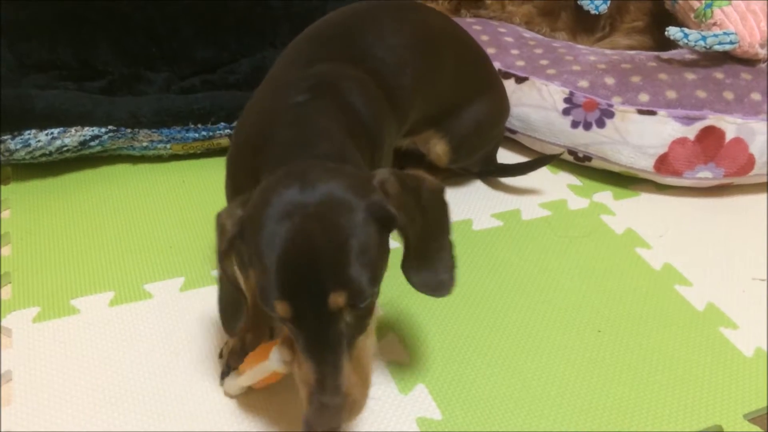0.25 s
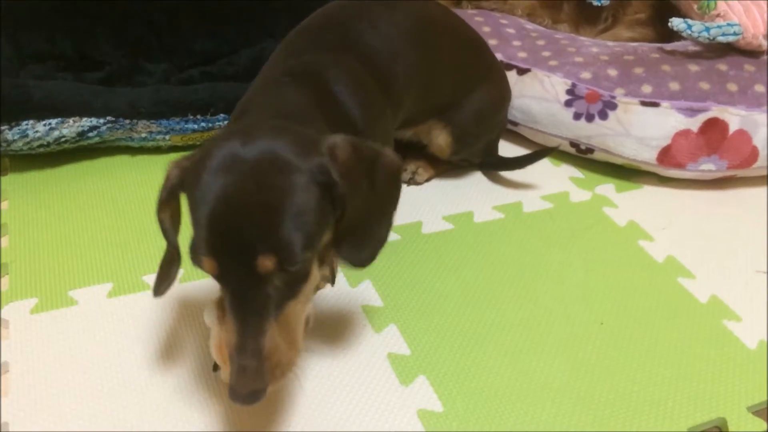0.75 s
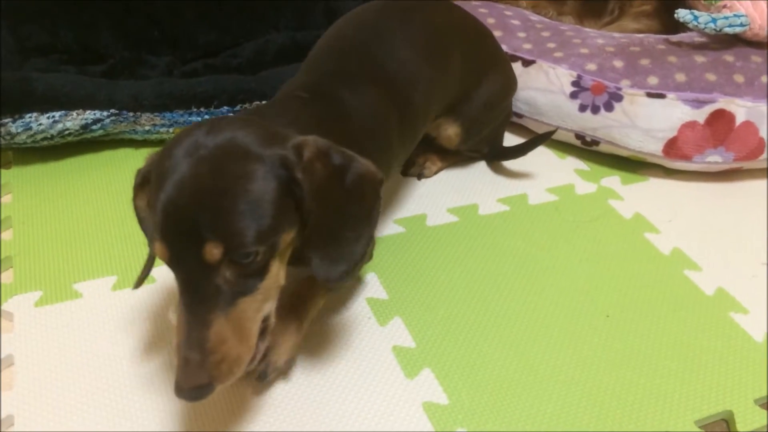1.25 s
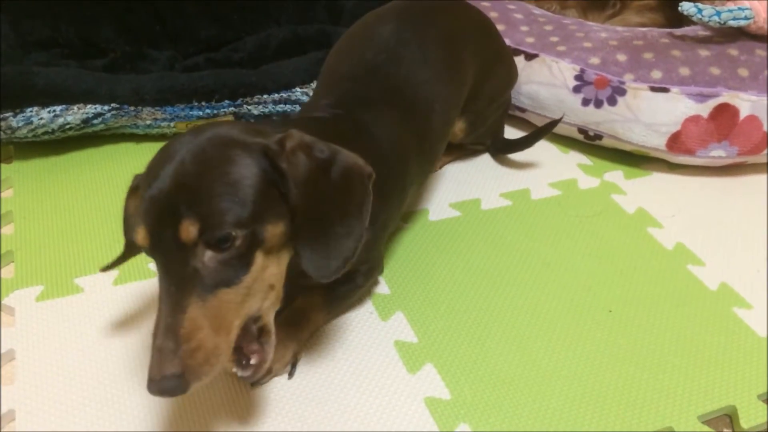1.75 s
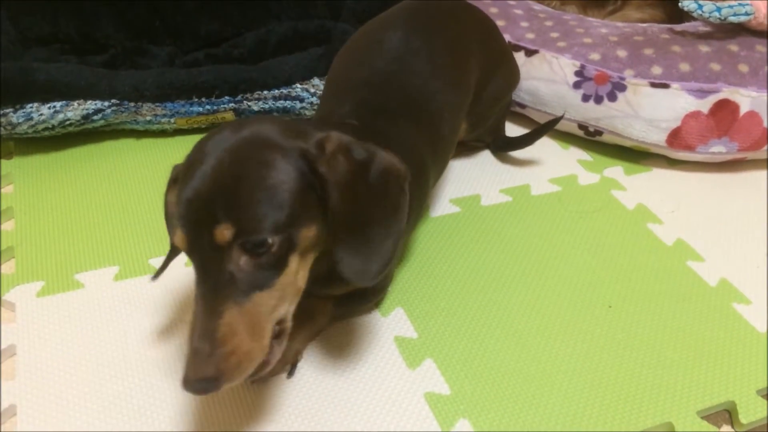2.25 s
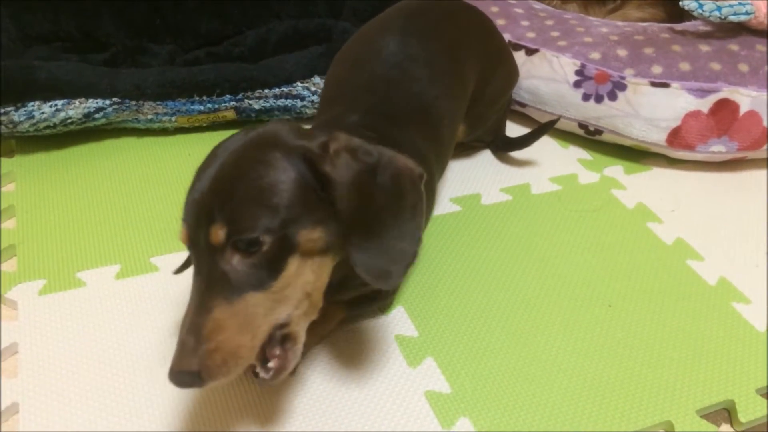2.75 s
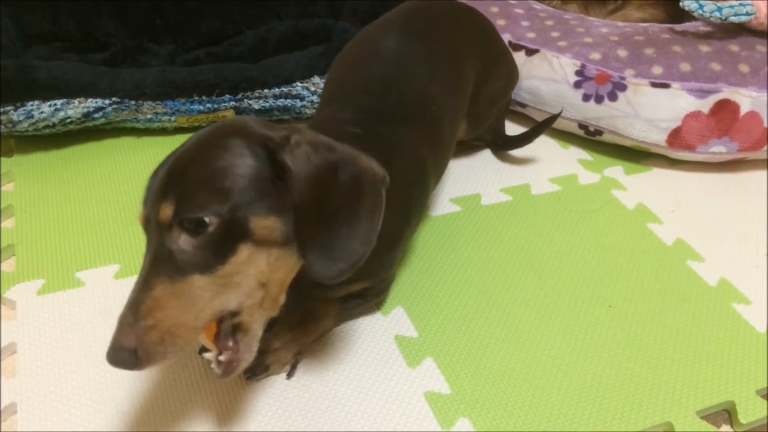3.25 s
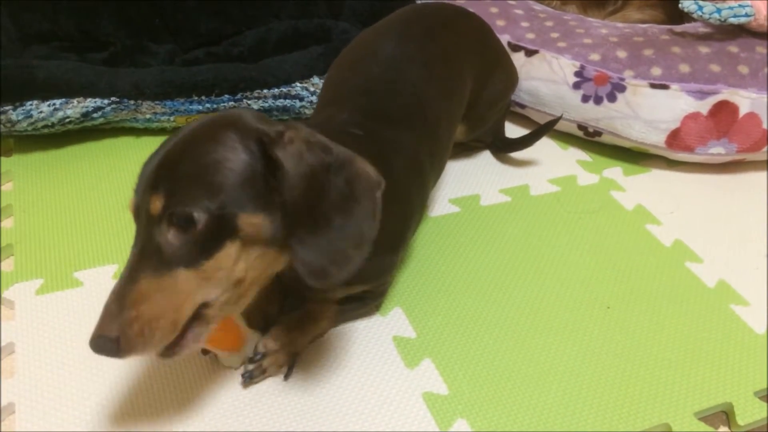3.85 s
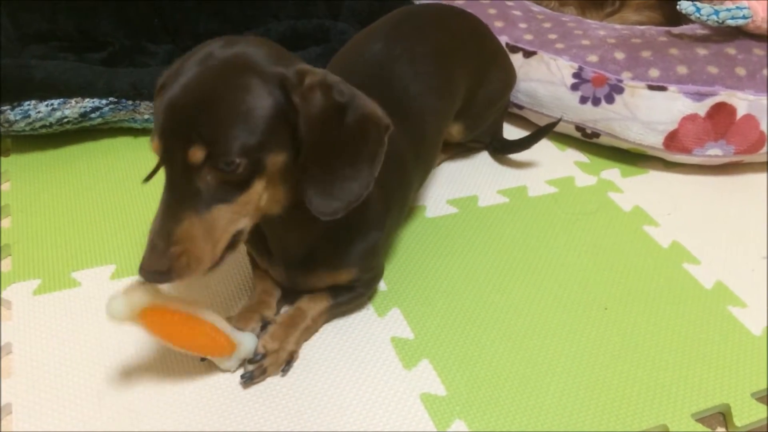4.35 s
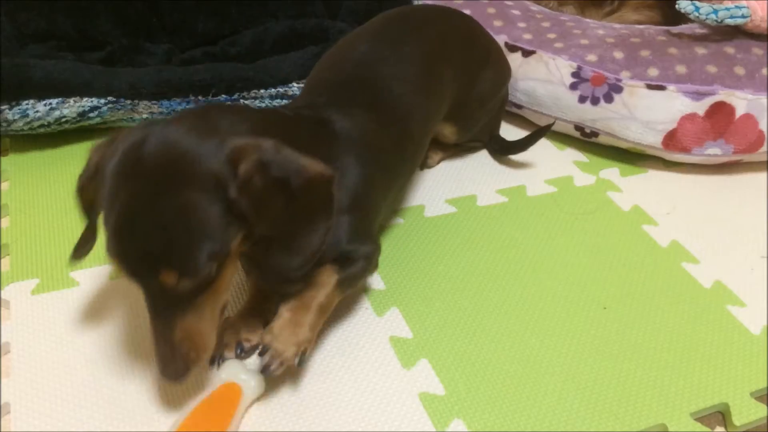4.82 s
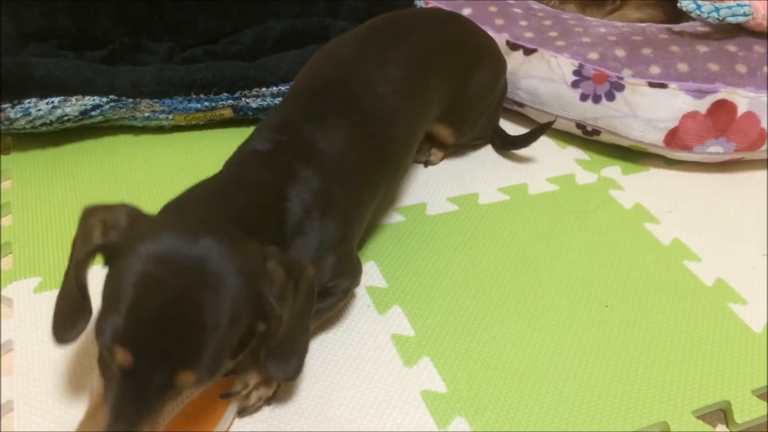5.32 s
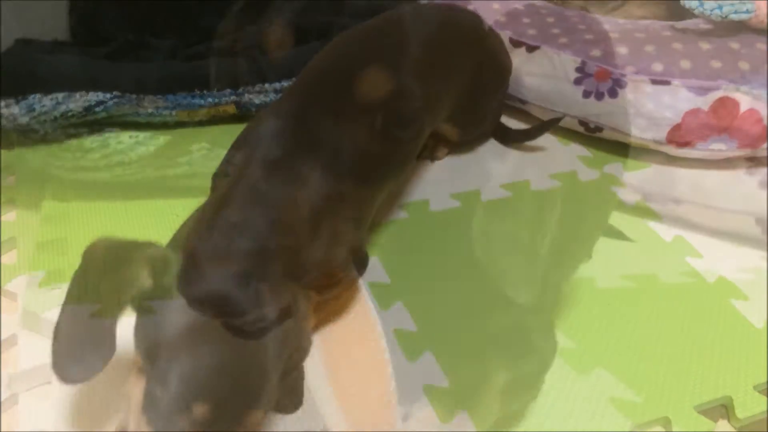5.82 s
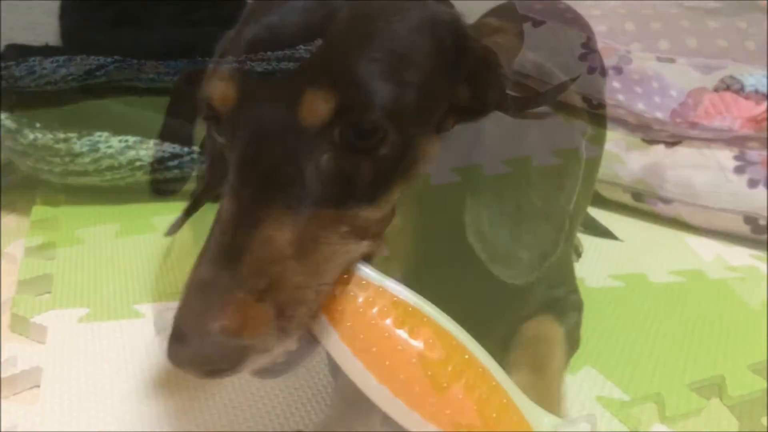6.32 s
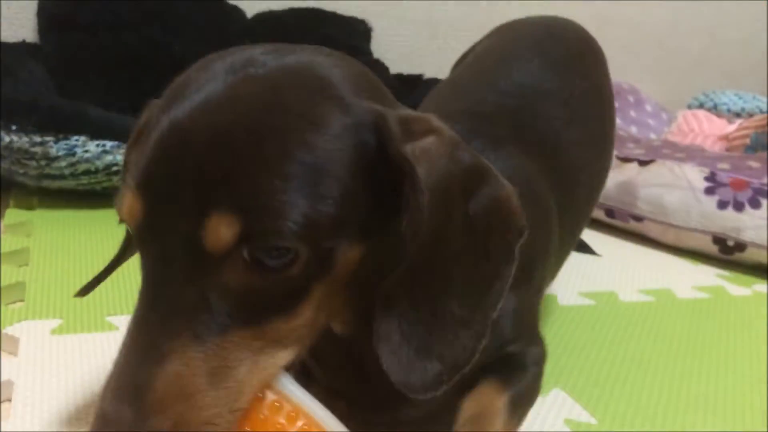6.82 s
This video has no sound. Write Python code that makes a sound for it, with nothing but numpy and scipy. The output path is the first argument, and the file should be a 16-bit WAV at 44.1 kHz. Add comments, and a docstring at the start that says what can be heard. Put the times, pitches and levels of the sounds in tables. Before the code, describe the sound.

A small dog gnaws a hard hollow toy in a quiet room, teeth knocking irregularly, the toy clacking onto foam mats, then closer chewing.

```python
"""Still air, a faint brushing of fur and a low floor rumble, then lips smack and teeth knock on a toy:
a small dog gnaws a hard chew toy on foam floor mats in a quiet room, the floor booming under its shifts.
The toy drops with a clack, is picked up again and is chewed and dragged over the mat, heard closer.
Blows are damped modes with noise cracks, rubbing is coloured random slips, the floor is evened noise
bands, and the room is noise that follows each band's stored energy."""
import sys
import numpy as np
from scipy import signal
from scipy.fft import rfft, irfft, next_fast_len
from scipy.io import wavfile
from scipy.ndimage import uniform_filter1d

SR = 44100
rng = np.random.default_rng(int(sys.argv[2]) if len(sys.argv) > 2 else 0)


def wrap_up_sound(samples):
    """Save the sound to the file named by the first command line argument, as 16-bit audio."""
    columns = np.atleast_2d(samples).T
    # keep every value between -1 and 1, then stretch to whole-number steps
    tamed = np.clip(columns, -1, 1)
    steps = np.round(tamed * 32767).astype(np.int16)
    wavfile.write(sys.argv[1], SR, steps)


N = 312228
TIME = np.arange(N) / SR
HIT_TIME = TIME[:2600]
ATTACK = HIT_TIME < 0.005


def from_db(db):
    """Decibels to gain."""
    return 10 ** (np.asarray(db) / 20)


def rms_one(x):
    """Scale to unit power."""
    return x / np.sqrt(np.mean(x ** 2) + 1e-20)


def attack_one(x):
    """Scale a hit to unit power over its attack."""
    return x / np.sqrt(np.mean(x[ATTACK] ** 2) + 1e-20)


def at_hz(points, hz, axis=1):
    """Read a table column on a log-frequency axis."""
    points = np.array(points)
    return np.interp(np.log(hz + 1), np.log(points[:, 0]), points[:, axis])


def band(x, low_hz, high_hz):
    """Causal band-pass."""
    edges_hz = [low_hz, min(high_hz, 0.48 * SR)]
    return signal.sosfilt(signal.butter(2, edges_hz, "band", fs=SR, output="sos"), x)


def resonance(x, hz, width_hz):
    """Two-pole resonance, gain 1 at its peak."""
    r = np.exp(-np.pi * width_hz / SR)
    zeros = (1 - r * r) / 2 * np.array([1, 0, -1])
    poles = [1, -2 * r * np.cos(2 * np.pi * hz / SR), r * r]
    return signal.lfilter(zeros, poles, x)


def coloured(x, spectrum):
    """Give a white excitation a spectrum; unit power."""
    gain = from_db(at_hz(spectrum, np.fft.rfftfreq(N, 1 / SR)))
    return rms_one(irfft(rfft(x) * gain, N))


def add(out, start_s, sound):
    """Mix a sound in at a time."""
    start = int(np.clip(round(start_s * SR), 0, N - 1))
    out[start:start + len(sound)] += sound[:N - start]


def friction(slips_per_s, spread_db, smooth):
    """Tiny random slips of uneven size over a smooth rush."""
    sizes = from_db(spread_db * np.minimum(rng.exponential(1, N), 4)) * rng.choice([-1, 1], N)
    slips = sizes * (rng.random(N) < slips_per_s / SR)
    return rms_one(slips) + smooth * rng.standard_normal(N)


# still-air spectrum: (frequency [Hz], relative density [dB per Hz])
AIR_SPECTRUM = [(15, -57), (25, -10), (64, 2.5), (178, 3), (260, -16.5), (378, -3), (741, -16),
                (919, -16.5), (1490, -22.5), (1620, -21), (4040, -30.5), (14300, -32.5), (15500, -55.5)]
AIR_DB = -62


def still_air():
    """Steady noise shaped to the room's quiet background."""
    return from_db(AIR_DB) * coloured(rng.standard_normal(N), AIR_SPECTRUM)


# rubbing and hissing spectra, shared by several frictions: (frequency [Hz], relative density [dB per Hz])
RUB_SPECTRUM = [(300, 0.5), (600, -4), (1050, 3), (1600, 1), (2100, 3), (2650, -17.5), (4500, -32),
                (8000, -26.5)]
HISS_SPECTRUM = [(2000, 3), (3500, 5.5), (6000, 0.5), (9000, 0), (12000, -3.5), (15500, -0.5)]
# brushing briskness: (time [s], level [dB], before trim)
SLIDING = [(0.0, -72), (0.47, -80), (0.78, -70), (1.46, -80), (1.72, -69.5), (1.89, -70.5), (2.03, -76.5),
           (2.75, -74), (3.85, -77), (4.24, -87), (4.82, -66.5), (5.33, -76), (5.5, -69), (5.98, -65.5),
           (6.35, -67.5), (6.85, -62.5), (7.08, -71.5)]
BRUSH_TRIM_DB = -3.5
BRUSH_HISS_DB, HISS_FOLLOWS = -75, 0.73   # hiss at mean briskness; its share of the swing


def sliding():
    """Fur and paws slip faintly over the foam; the hiss follows the rub's level in part."""
    rub_db = np.interp(TIME, *np.transpose(SLIDING))
    hiss_db = BRUSH_HISS_DB + HISS_FOLLOWS * (rub_db - rub_db.mean())
    coarse = friction(slips_per_s=120, spread_db=4.0, smooth=0.8)
    fine = friction(slips_per_s=120, spread_db=4.5, smooth=1.6)
    rub = from_db(rub_db + BRUSH_TRIM_DB) * coloured(coarse, RUB_SPECTRUM)
    return rub + from_db(hiss_db) * coloured(fine, HISS_SPECTRUM)


def floor_mode(low_hz, high_hz, even_s):
    """A broad floor resonance kept swinging by random pushes, at an even strength."""
    swing = band(rng.standard_normal(N), low_hz, high_hz)
    envelope = np.abs(signal.hilbert(swing, next_fast_len(N))[:N])
    power = uniform_filter1d(envelope ** 2, max(int(even_s * SR), 1))
    return rms_one(swing / np.sqrt(power + 1e-12))


PUSH_ATTACK_S = 0.011


def push_envelope(pushes, fall_db_per_s, rest_db):
    """Each push rises, holds and dies away; the strongest one leads."""
    out = np.full(N, from_db(rest_db))
    for start_s, hold_s, db in pushes:
        start = int(np.clip(start_s * SR, 0, N - 1))
        t = TIME[:min(SR, N - start)]
        rise = np.minimum(t / PUSH_ATTACK_S, 1)
        fall_s = np.maximum(t - PUSH_ATTACK_S - hold_s, 0)
        swell = rise * from_db(db - fall_db_per_s * fall_s)
        out[start:start + len(t)] = np.maximum(out[start:start + len(t)], swell)
    return out


# the dog bears down on the floor: (time [s], hold [s], boom level [dB], thud level [dB])
PUSHES = [(0.354, 0.075, -43.5, -56), (0.655, 0.0088, -55, -58.5), (0.708, 0.16, -58, -64),
          (1.093, 0.064, -63, -72), (1.44, 0.0076, -49, -65), (1.674, .05, -47.5, -63),
          (1.753, 0.049, -42, -54), (1.904, 0.21, -54.5, -66), (2.202, 0.055, -43, -49),
          (2.263, 0.077, -35.5, -44.5), (2.569, 0.1, -48.5, -57.5), (2.805, 0.03, -49.5, -52.5),
          (2.928, 0.031, -40, -38), (3.0, .02, -47, -51.5), (3.158, 0.15, -53, -60),
          (3.358, 0.0081, -43, -41), (3.408, 0.14, -47, -58), (3.658, 0.038, -47, -60.5),
          (3.819, 0.17, -42.5, -51), (4.019, 0.019, -46, -56), (4.705, 0.011, -42, -36),
          (4.741, 0.0071, -26.5, -39.5), (4.794, 0.012, -35, -47), (4.882, 0.016, -42, -60),
          (5.097, .04, -44.5, -58.5), (5.257, 0.32, -58, -62.5), (5.685, .02, -55.5, -54.5),
          (6.14, 0.0082, -57, -44), (6.457, 0.047, -57, -61), (6.81, 0.12, -55, -62)]
BOOM_FALL_DB_PER_S, THUD_FALL_DB_PER_S = 177, 277.5
BOOM_REST_DB, THUD_REST_DB = -68.5, -66   # the floor is never quite still


def floor():
    """The floor booms and thuds as the dog bears down; the thud dies sooner."""
    boom = floor_mode(low_hz=69, high_hz=90, even_s=0.028)
    thud = floor_mode(low_hz=140.2, high_hz=221.6, even_s=0.022)
    boom_pushes = [(s, hold_s, boom_db) for s, hold_s, boom_db, _ in PUSHES]
    thud_pushes = [(s, hold_s, thud_db) for s, hold_s, _, thud_db in PUSHES]
    boom_gain = push_envelope(boom_pushes, BOOM_FALL_DB_PER_S, BOOM_REST_DB)
    thud_gain = push_envelope(thud_pushes, THUD_FALL_DB_PER_S, THUD_REST_DB)
    return boom_gain * boom + thud_gain * thud


# bright bands of a crack, edge then tick: (low [Hz], high [Hz])
CRACK_BANDS = [(3900, 6770), (7600, 12400)]


def crack(levels_db, decay_s):
    """A bright noise burst that dies within milliseconds."""
    fade = np.exp(-HIT_TIME / decay_s)
    out = np.zeros(len(fade))
    for db, (low_hz, high_hz) in zip(levels_db, CRACK_BANDS):
        burst = rng.standard_normal(len(fade)) * fade
        out += from_db(db) * attack_one(band(burst, low_hz, high_hz))
    return out


# wet clicks of lips and tongue: (time [s], edge level [dB])
SMACKS = [(0.0722, -66), (0.5962, -63.5), (1.1467, -61), (1.5403, -86), (2.3147, -70), (2.4525, -78),
          (2.5308, -53), (2.542, -61), (3.1212, -68), (3.161, -83), (3.353, -55), (4.353, -91),
          (5.058, -55.5), (5.6279, -67), (5.964, -48.5), (6.1722, -60), (6.2797, -68), (6.426, -58.5),
          (6.6858, -65), (6.754, -60), (6.7816, -57)]
SMACK_TICK_DB = -61   # the top of every smack is equally strong
TICKS_PER_S, TICK_DB, TICK_SPREAD_DB = 5.5, -72.5, 2.5


def smacks():
    """Films of saliva snap as lips and tongue part; fainter ones tick at random times."""
    out = np.zeros(N)
    for s, edge_db in SMACKS:
        add(out, s, crack((edge_db, SMACK_TICK_DB), decay_s=0.0017))
    count = round(TICKS_PER_S * N / SR)
    for s, edge, tick in rng.uniform((0, -1, -1), (N / SR, 1, 1), (count, 3)):
        add(out, s, crack(TICK_DB + TICK_SPREAD_DB * np.array([edge, tick]), decay_s=0.0022))
    return out


def modal_ring(modes, grip, spread_db, rise_s, boost_db=0):
    """Damped modes; random shifts in pitch and strength make every ring differ, as under a new grip."""
    hz, db, t60_s = np.transpose(modes)[:, :, None]
    shift, strength = rng.uniform(-1, 1, (2, *hz.shape))
    gain = from_db(db + boost_db + spread_db * strength - 60 * HIT_TIME / t60_s)
    sign = (-1) ** np.arange(len(modes))[:, None]
    phase = 2 * np.pi * hz * (1 + grip * shift) * HIT_TIME
    ring = np.sum(sign * gain * np.sin(phase), axis=0)
    return attack_one(ring * (1 - np.exp(-HIT_TIME / rise_s)))


def favour(modes, pitch_hz, top_db, octaves):
    """Favour the modes near one pitch: dB for each mode."""
    distance = np.log2(np.array(modes)[:, :1] / pitch_hz) / octaves
    return top_db * np.exp(-distance ** 2)


# gripped toy, registers body, hollow, clack, rim: (nominal frequency [Hz], relative level [dB], T60 [s])
TOY_MODES = [
    [(411, 2, 0.019), (699, 3, 0.017), (860, -2.5, 0.026)],
    [(934, 3.5, 0.01), (1300, 6.5, 0.013), (1427, 9, 0.0071), (1633, -2, 0.017)],
    [(1917, 0.5, 0.018), (2290, -1.5, 0.022), (2526, 1, 0.0084)],
    [(2947, -1, 0.014), (3250, -4.5, 0.021), (3520, 6, 0.0053)],
]
# how readily each register answers: (relative level [dB])
REGISTER_DB = [-1, 1.5, -1.5, -7.5]
TILT_PIVOT_HZ = 1500   # positive tilt (hard) lifts the ring above this pitch, negative (soft) below
TICK_UNDER_EDGE_DB, GLANCE_BRIGHTENS = 5, 0.13   # brighter top when the crack outweighs the ring


def knock(pitch_hz, level_db, tilt_db_per_octave, crack_db):
    """A crack and a ring: hardness tilts the toy's registers, the spot struck favours one pitch."""
    tick_db = crack_db - TICK_UNDER_EDGE_DB + GLANCE_BRIGHTENS * (crack_db - level_db)
    sound = crack((crack_db, tick_db), decay_s=0.0015)
    for sign, answer_db, modes in zip((1, -1, -1, 1), REGISTER_DB, TOY_MODES):
        octaves_up = np.mean(np.log2(np.array(modes)[:, 0] / TILT_PIVOT_HZ))
        favour_db = favour(modes, pitch_hz, top_db=11, octaves=0.23).max()
        db = level_db + answer_db + tilt_db_per_octave * octaves_up + favour_db
        boost_db = favour(modes, pitch_hz, top_db=10.0, octaves=0.21)
        ring = modal_ring(modes, grip=0.026, spread_db=2.5, rise_s=0.00041, boost_db=boost_db)
        sound = sound + sign * from_db(db) * ring
    return sound


# teeth and floor strike the toy, except near 5.42 s, where one hears a bright two-step click:
# (time [s], favoured pitch [Hz], base level [dB], tilt [dB per octave], crack edge level [dB])
SHARP_KNOCKS = [(0.1228, 1340, -69, 2, -74), (0.1973, 1330, -74.5, -17, -74),
                (0.3524, 2330, -67.5, 6.5, -69), (0.3603, 1150, -63, -6, -75), (0.66, 2440, -70.5, -7, -75),
                (0.6715, 2520, -69.5, 14, -64), (0.7434, 2640, -65.5, 7, -63),
                (0.8945, 1830, -74.5, 1, -67), (1.1211, 1980, -71.5, 14, -57.5),
                (1.163, 3500, -67, 13, -52.5), (1.195, 2100, -74, 8, -72), (1.68, 1800, -75, 11, -72),
                (1.888, 2400, -69, -0.5, -69), (2.0223, 2530, -56, 1, -56), (2.046, 2140, -52.5, 0.5, -52),
                (2.1944, 2280, -58.5, -2, -69), (2.2098, 2400, -50, 0, -54.5), (2.279, 2670, -58, -1, -58),
                (2.2857, 2210, -50, -7.5, -59), (2.2888, 2350, -56, -6, -65), (2.3017, 2430, -67, 5, -56),
                (2.584, 587, -50, -1.5, -70), (2.9385, 730, -42.5, -4, -55.5),
                (2.9429, 2240, -40.5, -7.5, -61), (2.9446, 1005, -45, -4, -69), (3.002, 1200, -67, 7, -63),
                (3.022, 2040, -63, 2, -64.5), (3.3635, 2870, -40, -5, -46), (3.3662, 3040, -57, 1, -59),
                (3.6274, 1310, -69.5, 14, -62.5), (3.8354, 2410, -40, -7.5, -62),
                (3.8382, 2240, -55, 6, -58.5), (3.8499, 1230, -56.5, -6, -82),
                (3.9273, 2340, -56, -7.5, -62.5), (4.7118, 2120, -45, -1, -54),
                (4.7178, 2110, -30.5, 4, -49), (4.7192, 3370, -35, 4, -41), (4.7217, 760, -37, -3, -50),
                (4.744, 1840, -51, 2.5, -74), (4.761, 1550, -55, 0, -78), (4.7784, 1640, -55.5, -2, -57),
                (4.8337, 1430, -57, -1, -68), (5.0968, 3600, -59.5, 1, -56), (5.2519, 3710, -66, 8, -53.5),
                (5.4243, 1990, -53, 0, -59), (5.4253, 2400, -92, 8, -42.5), (5.6452, 553, -57, -2.5, -53),
                (5.6998, 1384, -70, -13.5, -54), (5.952, 2010, -76, 19, -75),
                (6.0697, 1350, -48.5, -2.5, -68), (6.0846, 1410, -61.5, -11, -84),
                (6.132, 2500, -61.5, -7, -83), (6.15, 445, -49.5, 2.5, -59), (6.157, 450, -47, -0.5, -54),
                (6.199, 450, -54, 0.5, -63), (6.2163, 3850, -54.5, 7, -52), (6.458, 1990, -56, 1.5, -62),
                (6.4982, 1660, -50, 3, -51), (6.796, 2090, -62.5, 15, -49.5),
                (6.8271, 1760, -53.5, -2.5, -51), (6.9415, 1440, -68.5, 0, -81)]
# jaws close on the toy with a soft, dull knock: (time [s], base level [dB])
CHOMPS = [(0.6622, -65), (1.2953, -70), (1.749, -63), (1.8258, -69.5), (1.8659, -70), (2.3155, -58.5),
          (2.7981, -64), (3.2278, -65.5), (3.4572, -63), (3.7323, -66.5), (3.9, -64.5), (4.2555, -66.5),
          (6.6078, -66.5), (6.6666, -65.5)]
CHOMP_HZ, CHOMP_TILT_DB_PER_OCTAVE = 454, -5.5
CHOMP_CRACK_REL_DB = -11.5


def knocks():
    """Sharp knocks, a bright two-step click and dull chomps, all from the same modes and cracks."""
    out = np.zeros(N)
    for s, *settings in SHARP_KNOCKS:
        add(out, s, knock(*settings))
    for s, db in CHOMPS:
        add(out, s, knock(CHOMP_HZ, db, CHOMP_TILT_DB_PER_OCTAVE, db + CHOMP_CRACK_REL_DB))
    return out


# hollow shell resonances: (frequency [Hz], width [Hz], level before trim [dB])
SHELL_MODES = [(482, 22, -10), (712, 22, -10), (1000, 14, -6), (1040, 14, -7), (1200, 20, -4),
               (1410, 16, -7), (1550, 18, -10), (1840, 20, -10), (2218, 28, -6), (2420, 30, -6),
               (2860, 40, -15), (3370, 50, -11)]
SHELL_TRIM_DB = -0.5


def shell(x, delay_s):
    """Knocks and gnawing travel into the hollow shell, whose narrow resonances ring on faintly."""
    driven = np.pad(x, round(delay_s * SR))[:N] + 1e-18
    ring = sum(from_db(db) * resonance(driven, hz, width_hz) for hz, width_hz, db in SHELL_MODES)
    return from_db(SHELL_TRIM_DB) * ring


# room's answer to a knock: (frequency [Hz], level [dB], T60 [s])
ROOM = [(150, 0, 0.42), (400, -12.5, 0.13), (1020, -5, 0.29), (2110, -10, 0.26), (3240, -13.5, 0.19),
        (7100, -11, 0.31), (15000, -14.5, 0.14)]


def room(x, build_s):
    """Diffuse echoes: each band's energy builds up in the room and dies away at its own rate."""
    edges_hz = np.geomspace(130, 16000, 15)
    white = rng.standard_normal((2, N))
    build = np.exp(-1 / (build_s * SR))
    out = np.zeros(N)
    for k, (low_hz, high_hz) in enumerate(zip(edges_hz, edges_hz[1:])):
        centre_hz = np.sqrt(low_hz * high_hz)
        t60_s = at_hz(ROOM, centre_hz, axis=2)
        keep = from_db(-60 / (t60_s * SR)) ** 2
        energy = band(x + 1e-9 * white[0], low_hz, high_hz) ** 2
        stored = signal.lfilter([1 - keep], [1, -keep], energy)
        stored = signal.lfilter([1 - build], [1, -build], stored)
        carrier = rms_one(band(white[k % 2], low_hz, high_hz))
        out += from_db(at_hz(ROOM, centre_hz)) * np.sqrt(stored) * carrier
    return out


def strokes(rows, taper):
    """Strokes swell and fade: one gain curve for their middle range, one for their hiss."""
    middle, hiss = np.zeros((2, N))
    for start_s, end_s, middle_db, hiss_db in rows:
        length = max(int((end_s - start_s) * SR), 2)
        swell = signal.windows.tukey(length, np.clip(taper, 0, 1))
        add(middle, start_s, from_db(middle_db) * swell)
        add(hiss, start_s, from_db(hiss_db) * swell)
    return middle, hiss


# rasping spectrum: (frequency [Hz], relative density [dB per Hz])
RASP_SPECTRUM = [(300, 3), (700, -1), (1300, 2.5), (1900, -1), (2250, 12.5), (2500, -25), (2750, -12),
                 (3200, -11), (7000, -53)]
# teeth skid over the toy: (start [s], end [s], rasp level [dB], hiss level [dB]), before trim
GNAWS = [(0.16, 0.23, -60, -89), (0.35, 0.39, -66, -63), (0.655, 0.7, -65, -82), (0.88, 0.94, -74, -76),
         (1.1, 1.22, -67, -58.5), (1.67, 1.92, -67.5, -88), (2.042, 2.09, -60, -81), (2.19, 2.25, -57, -81),
         (2.27, 2.34, -68, -69), (3.15, 3.19, -77, -57.5), (3.92, 4.03, -59.5, -61.5),
         (5.08, 5.12, -61, -58.5), (5.632, 5.655, -65.5, -51), (5.695, 5.724, -58, -51),
         (6.625, 6.65, -65, -53)]
GNAW_RASP_TRIM_DB, GNAW_HISS_TRIM_DB = -5.5, -4


def gnawing():
    """Teeth catch and slip on the toy in a quick, uneven crackle that rings briefly in its rim."""
    rasp, hiss = strokes(GNAWS, taper=0.6)
    slips = friction(slips_per_s=260, spread_db=4.5, smooth=0.25)
    low_rim = resonance(slips, 2485, width_hz=90)
    high_rim = from_db(-19.5) * resonance(slips, 3800, width_hz=260)
    crackle = coloured(slips, RASP_SPECTRUM) + from_db(-3) * rms_one(low_rim + high_rim)
    rasping = from_db(GNAW_RASP_TRIM_DB) * rasp * crackle
    return rasping + from_db(GNAW_HISS_TRIM_DB) * hiss * coloured(slips, HISS_SPECTRUM)


# toy skids or is dragged over the mat: (start [s], end [s], rub level [dB], hiss level [dB]), before trim
DRAGS = [(4.715, 4.86, -58, -82), (5.81, 5.91, -68.5, -71.5), (5.9, 5.99, -65, -70),
         (6.38, 6.52, -66, -69.5), (6.49, 6.6, -64.5, -66), (6.85, 6.985, -59.5, -69),
         (7.03, 7.08, -68, -80)]
DRAG_RUB_TRIM_DB, DRAG_HISS_TRIM_DB = 6.5, 10


def dragging():
    """The toy's tip runs over the fine grain of the foam, and its hollow body colours the rush."""
    rub, hiss = strokes(DRAGS, taper=0.9)
    grain = friction(slips_per_s=500, spread_db=3.5, smooth=0.45)
    rush = friction(slips_per_s=4700, spread_db=2.0, smooth=1.5)
    rubbing = from_db(DRAG_RUB_TRIM_DB) * rub * coloured(grain, RUB_SPECTRUM)
    return rubbing + from_db(DRAG_HISS_TRIM_DB) * hiss * coloured(rush, HISS_SPECTRUM)


# mat under the toy: (nominal frequency [Hz], relative level [dB], T60 [s])
MAT_MODES = [(140, -0.5, 0.062), (296, -0.5, 0.074), (397, -2.5, 0.1), (550, -25, 0.022)]
# toy bumps down flat on the mat: (time [s], level [dB])
BUMPS = [(6.1501, -35.5), (6.158, -45), (6.2, -49)]


def bumps():
    """The foam softens the toy's landing to a low, hollow bump of damped modes."""
    out = np.zeros(N)
    for s, db in BUMPS:
        ring = modal_ring(MAT_MODES, grip=0.015, spread_db=1.0, rise_s=0.00077)
        add(out, s, from_db(db) * ring)
    return out


def scene():
    """Mouth and toy in the room, over the floor's boom and still air."""
    toy = knocks() + gnawing()
    chewing = toy + bumps() + smacks()
    ringing = shell(toy, delay_s=0.004)
    # the sound turns drier from 5.2 to 5.9 s and stays so
    wet_db = np.interp(TIME, [5.2, 5.9], [-2, -4.5])
    echoes = room(chewing * from_db(wet_db), build_s=0.0014)
    return (chewing + ringing + echoes + dragging() + sliding() + floor() + still_air())[None]


CUTOFF_HZ = 15700


def record(dry):
    """The top is cut steeply by an elliptic low-pass."""
    return signal.sosfilt(signal.ellip(10, 0.2, 70, CUTOFF_HZ, fs=SR, output="sos"), dry)


dry = scene()
out = record(dry)
wrap_up_sound(out)
```